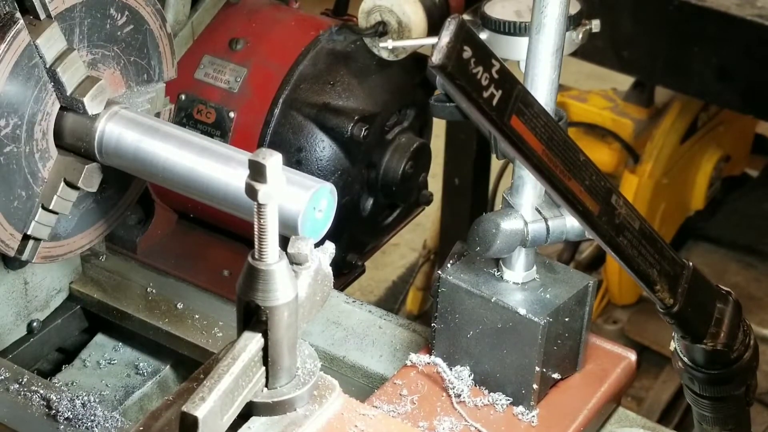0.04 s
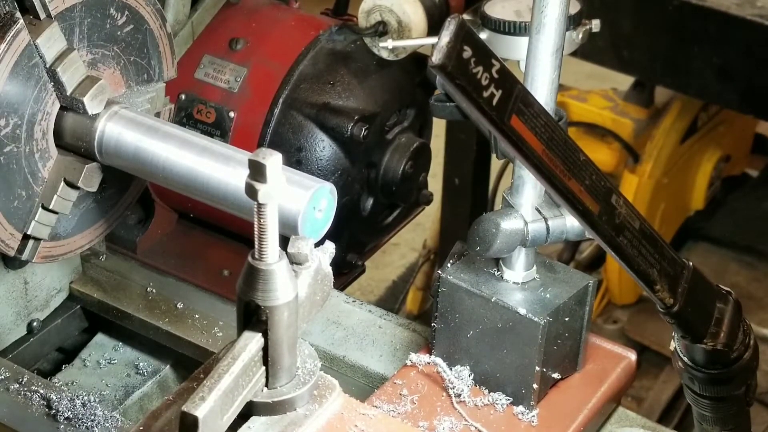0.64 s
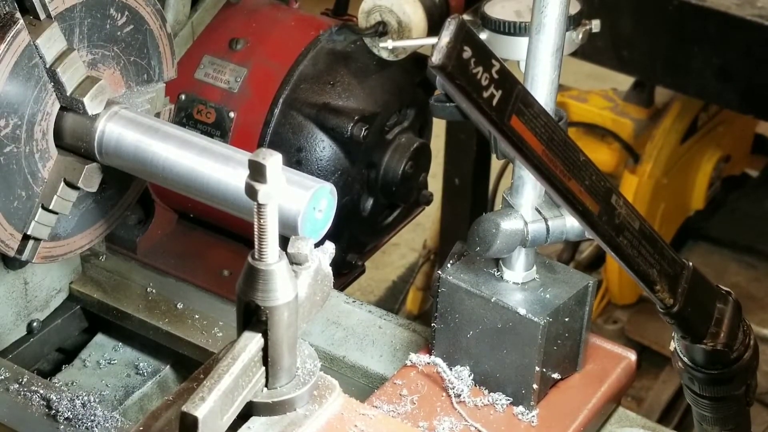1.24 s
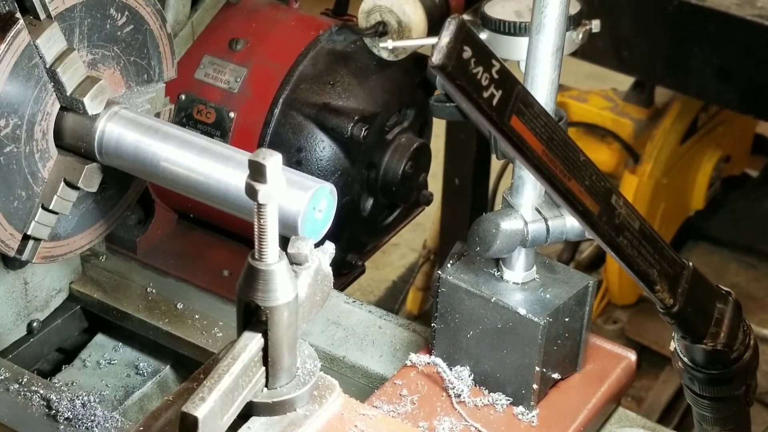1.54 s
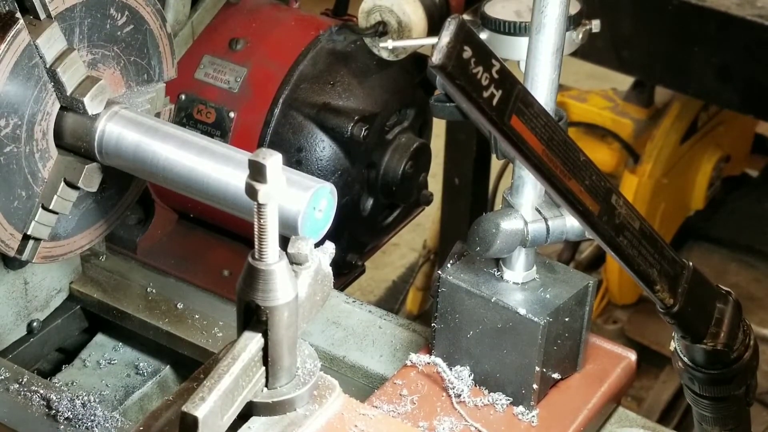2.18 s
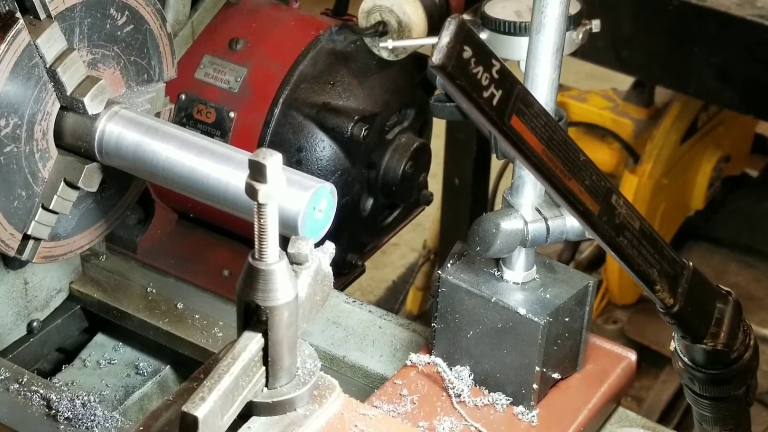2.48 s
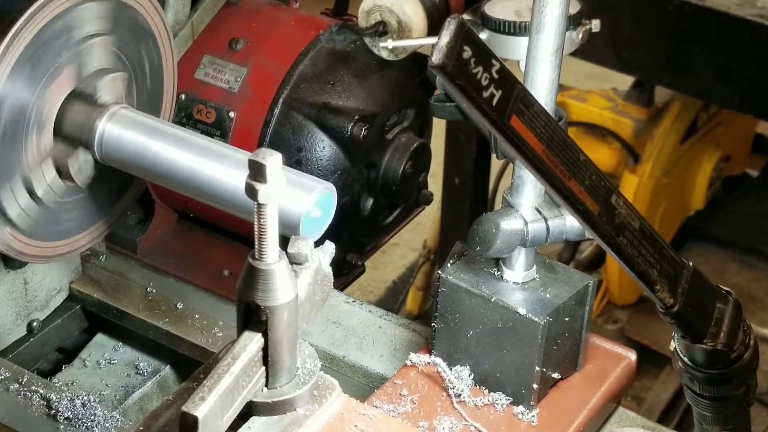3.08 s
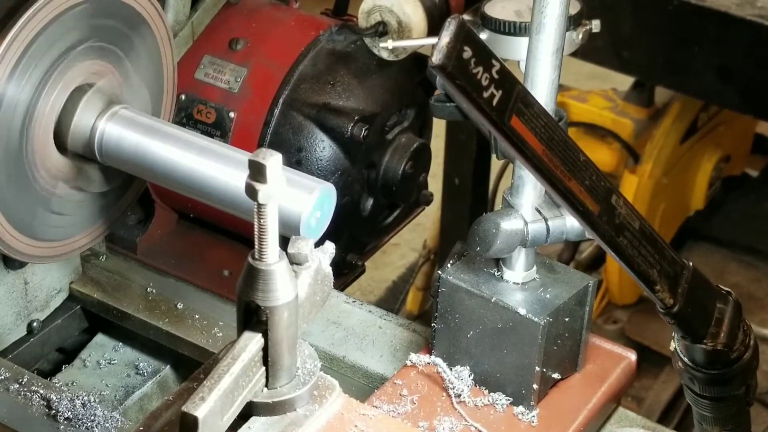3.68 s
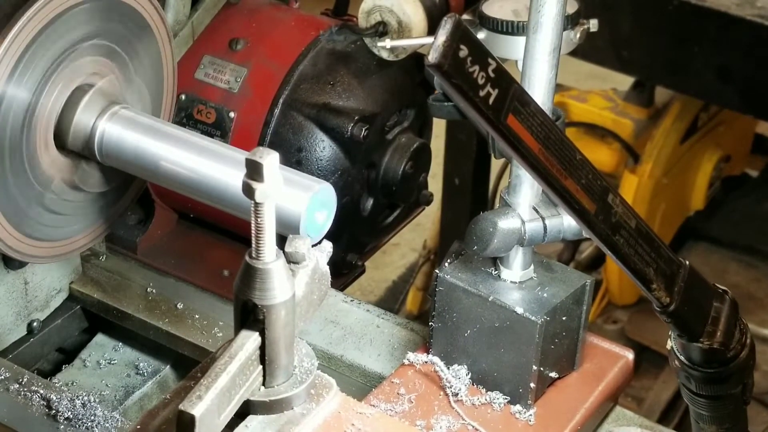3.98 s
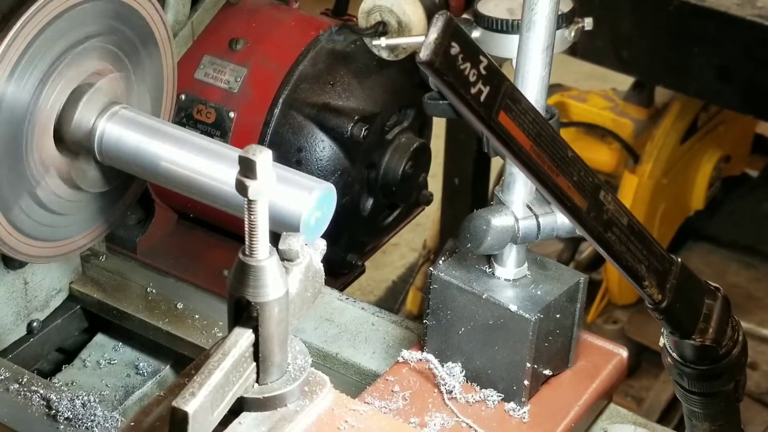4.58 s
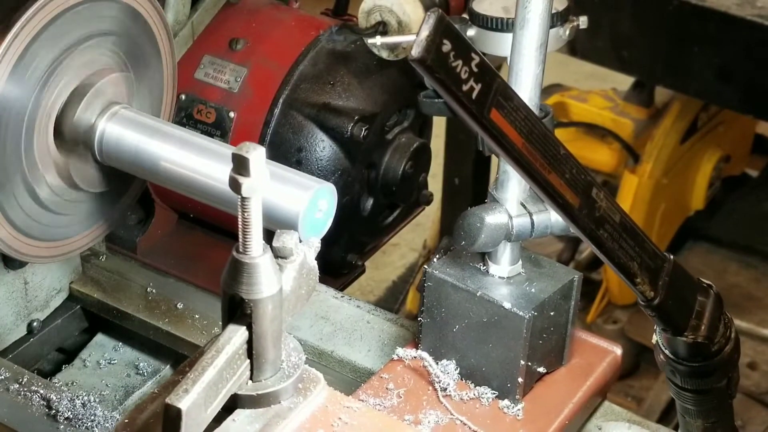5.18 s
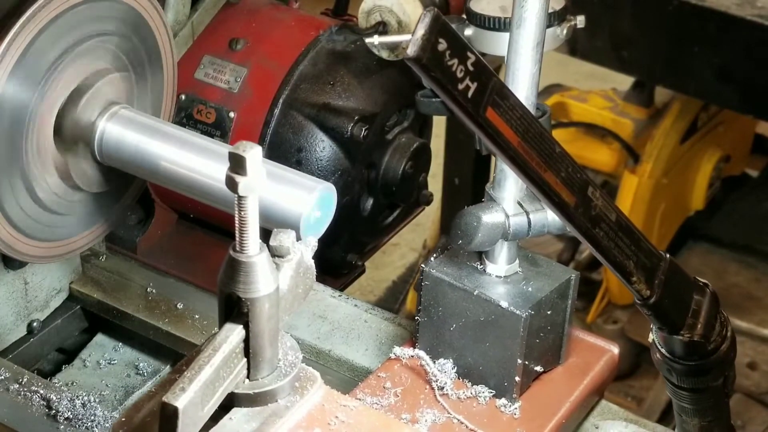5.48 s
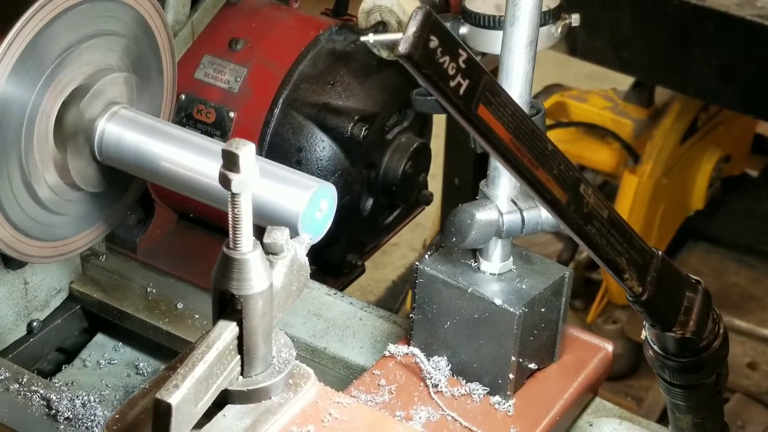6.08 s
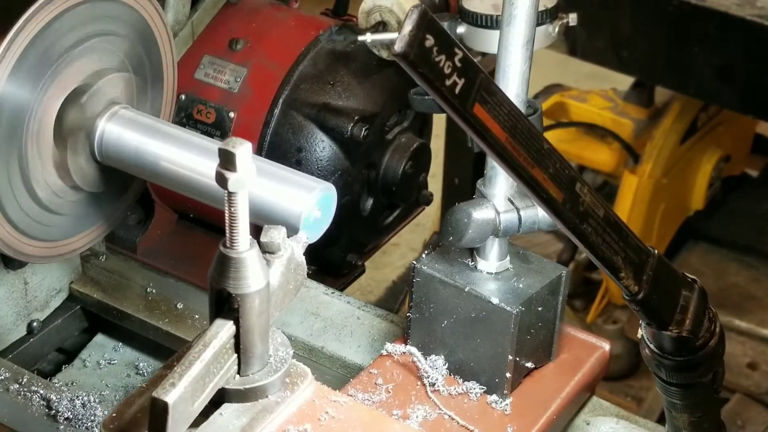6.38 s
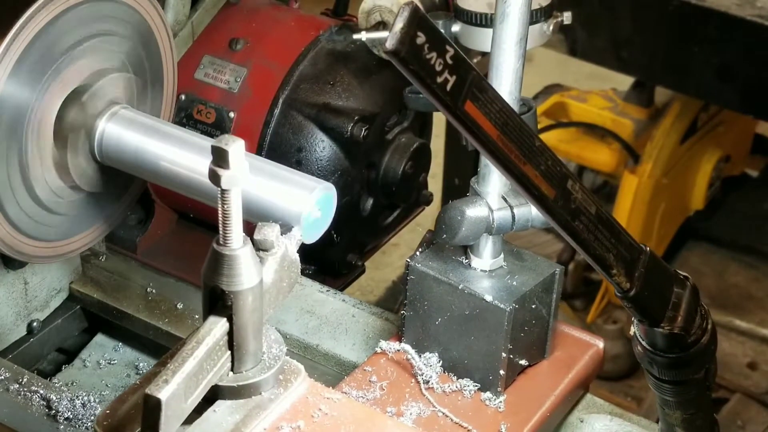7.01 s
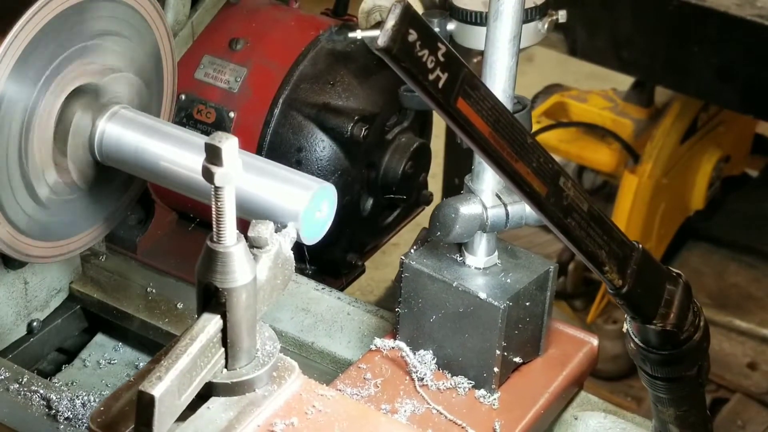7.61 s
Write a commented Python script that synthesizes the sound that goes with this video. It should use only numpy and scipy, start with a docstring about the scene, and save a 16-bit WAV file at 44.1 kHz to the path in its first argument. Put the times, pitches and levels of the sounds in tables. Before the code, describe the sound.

A metal lathe stands idle in a small workshop with a faint low drone. Its levers knock and click at about 0.2 to 0.4 seconds and again around 0.9 seconds, with a short room echo, followed by a few faint rubs. At about 2.9 seconds a switch clacks and the motor hums into life; the belt squeals briefly and the heavy frame shudders. By 3.6 seconds the machine is at full speed, close and steady, with gears whining and rattling over the electric hum and a low rumble. The drive ticks sharply four or five times a second, and a loose metal part pings and jingles lightly. From about 6.6 seconds the tool meets an aluminium bar, adding a light, pulsing chatter and a hiss of chips. Several short, high squeaks come between 7.1 and 7.7 seconds, and the cut continues to the end at about 8 seconds.

```python
"""A metal lathe runs in a small workshop: gears whine and rattle the headstock over the motor's mains hum.
First its levers knock, the switch clacks and the belt takes up the drive with a squeal and a shudder.
The drive ticks twice per spindle turn; a loose part pings and jingles.
Near the end the tool meets an aluminium bar: a light, chattering cut with chip hiss and short squeaks."""
import sys
import numpy as np
from scipy import signal
from scipy.fft import rfft, irfft, next_fast_len
from scipy.io import wavfile
from scipy.ndimage import map_coordinates

SR = 44100
rng = np.random.default_rng(int(sys.argv[2]) if len(sys.argv) > 2 else 0)


def file_out(sig):
    """Save sig as 16-bit WAV at sys.argv[1]."""
    # one column per channel
    cols = np.atleast_2d(sig).T
    # limit, then scale
    lim = np.clip(cols, -1, 1)
    pcm = np.round(lim * 32767).astype(np.int16)
    wavfile.write(sys.argv[1], SR, pcm)


N = 346185
START_S, RUN_UP_S = 2.95, 0.62
SPINDLE_HZ, MAINS_HZ, TOP_HZ = 2.211, 60.02, 15750

# stereo image: (frequency [Hz], left-right correlation [-])
CORRELATION = [(60, 0.95), (200, 0.96), (350, 0.91), (600, 0.7), (1100, 0.32), (2500, 0.22), (6000, 0.019),
               (13000, 0.037)]
# shop drone: (time [s], frequency [Hz], level [dB], octave level [dB])
DRONE = [(0, 57.7, -59, -81), (0.55, 55.1, -50.5, -59), (1.2, 58.2, -57, -61), (1.5, 65.3, -51, -56),
         (1.75, 67.76, -56, -58), (2.06, 69.84, -64, -73), (2.4, 65.95, -53, -57), (2.7, 63.75, -48, -54),
         (2.8, 65.9, -59, -67)]
# room noise: (frequency [Hz], relative density [dB])
ROOM_SPECTRUM = [(25, -29), (55, 0), (95, -8), (135, -7.5), (190, -14.5), (260, -19), (320, -17.5),
                 (375, -32.5), (440, -32), (510, -40), (2100, -41), (4200, -46.5), (8000, -60.5),
                 (12000, -40), (15600, -38.5)]
# shop reverberation: (frequency [Hz], t60 [s])
ROOM_DECAY = [(120, 0.74), (500, 0.69), (2000, 0.56), (5000, 0.84), (12000, 0.23)]
# lever, switch and drive contacts: (time [s], level [dB], hardness [octaves above 200 Hz])
KNOCKS = [(0.176, -38, 3), (0.1996, -24.5, 2), (0.24, -32, 2.5), (0.282, -40, 3.5), (0.348, -34.5, 2.5),
          (0.383, -33.5, 0.85), (0.420, -38, 5), (0.865, -27.5, 1.23), (0.868, -38.5, 3), (0.88, -36, 0.73),
          (0.894, -28.5, -0.64), (0.97, -42, 0.66), (1.018, -45.5, 3), (2.47, -73, 7.4), (2.906, -33, 2.9),
          (2.914, -34.5, 5), (2.942, -24, 2.4), (3.007, -24.5, 1.2), (3.055, -37.5, 5), (3.12, -42, 5),
          (3.231, -33, 1.63)]
# noise bands of a contact: (low edge [Hz], high edge [Hz], attack [s], t60 [s], gain [dB])
KNOCK_BANDS = [(94, 430, 0.0031, 0.22, 0.5), (460, 1120, 0.001, 0.15, 0.5),
               (1270, 2300, 0.0011, 0.16, -0.5), (3200, 3900, 0.0066, 0.098, -2),
               (7500, 25000, 0.0055, 0.042, 13.5)]
# lever linkage: (frequency [Hz], gain [dB], t60 [s])
LEVER_MODES = [(141.8, -3.5, 0.77), (239, -16, 0.3), (287.6, -2.5, 0.37), (348, -3, 0.09),
               (493, -12.5, 0.34), (633.6, -9, 0.23), (736, 3.5, 0.11), (885, 0.5, 0.053), (1187, -6, 0.21),
               (1576, -18, 0.1), (1970, -12, 0.12), (2380, -3, 0.12), (2593, -6.5, 0.24), (2690, -10, 0.15),
               (4180, -7, 0.038), (4830, -7, 0.019)]
# hard strikes of the loose part: (time [s], level [dB])
HARD_PINGS = [(0.348, -47), (3.338, -44), (3.483, -49), (3.563, -49), (3.99, -51), (4.297, -42.5),
              (4.398, -49), (5.111, -46), (5.923, -37), (6.025, -55), (6.228, -42), (6.533, -47)]
# loose part's ring: (frequency [Hz], width [Hz], gain [dB])
PING_PEAKS = [(6250, 260, 1), (6850, 400, -3)]
# jingling steel: (frequency [Hz], width [Hz], gain [dB])
TINKLE_PEAKS = [(8090, 150, -17), (9300, 160, 6), (10200, 200, -4), (12100, 200, 0), (12740, 200, 0)]
# drops of a small catch: (time [s], level [dB])
CATCH_DROPS = [(0.349, -47), (1.017, -39)]
# catch's ring: (frequency [Hz], gain [dB], t60 [s])
CATCH_MODES = [(1390, -4.5, 0.04), (1740, 0, 0.04), (1820, 1.5, 0.039), (1960, -12, 0.039),
               (2380, -6.5, 0.033)]
# rubs on the machine: (time [s], level [dB], Gaussian sigma [s])
BRUSHES = [(1.72, -71.5, 0.055), (2.47, -63.5, 0.019), (2.786, -69, 0.015), (2.91, -53, 0.014)]
# rubbing noise: (frequency [Hz], relative density [dB])
BRUSH_SPECTRUM = [(200, 3), (600, -2), (1150, -3), (2200, -17), (6000, -25), (14000, -24)]
# switch box: (frequency [Hz], gain [dB], t60 [s])
SWITCH_MODES = [(355, -2, 0.09), (630, -4, 0.035), (689, 8.5, 0.045), (1378, -7, 0.04), (1567, -10, 0.06),
                (2150, -17, 0.065), (2939, -18, 0.045), (3690, -24, 0.042), (5030, -28, 0.035)]
# motor's main note: (time [s], hum level [dB], rotor level [dB])
MOTOR_LEVELS = [(2.95, -37, -60), (2.985, -24, -60), (3.015, -39, -60), (3.055, -25.5, -58),
                (3.11, -35.5, -62), (3.26, -34.5, -47), (3.5, -35, -62.5), (3.9, -39, -58), (4.8, -40, -43),
                (6.35, -36.5, -40), (7.05, -41, -49), (7.43, -41, -59), (7.475, -28, -37),
                (7.58, -40, -46.5)]
# magnetic hum: (mains multiple [-], gain [dB])
HUM_HARMONICS = [(2, -11), (4, -16.5), (7, -15.5), (12, -32)]
# belt squeal: (frequency [Hz], width [Hz], gain [dB])
SQUEAL_PEAKS = [(988, 36, -7.5), (1110, 63, -2.5), (1250, 100, -11)]
# headstock casting: (frequency [Hz], relative density [dB])
CASTING_SPECTRUM = [(200, -49), (380, -5.5), (600, -1.5), (950, 1.5), (1120, -1), (1450, -6.5), (1800, -3),
                    (1950, -10.5), (2200, -5.5), (2800, -15), (4400, -22.5), (5600, -28.5), (6600, -29),
                    (7400, -42), (10500, -34), (15500, -46)]
# gear whine: (tooth-rate multiple [-], level [dB])
WHINE_HARMONICS = [(2, -51), (3, -59), (5, -51.5), (6, -51.5), (7, -56), (8, -45.5), (9, -53), (11, -48),
                   (12, -56), (14, -54), (18, -61)]
# drive rumble: (frequency [Hz], relative density [dB])
RUMBLE_SPECTRUM = [(25, -24), (55, -14.5), (95, -2.5), (135, 2.5), (165, -5), (250, -3.5), (320, -5.5),
                   (390, -4.5), (480, -14), (700, -45)]
# panels and guards: (frequency [Hz], width [Hz], level [dB])
PANEL_PEAKS = [(95.7, 12, -49), (140.6, 12.7, -40.5), (176, 6, -48), (202, 13, -52.5), (216, 13, -48),
               (290, 26, -49), (330, 13, -47), (417, 17, -57), (517, 16, -51.5), (554, 3.8, -53),
               (791.6, 20, -44), (856, 12, -54), (905, 10, -56), (984, 29, -44.5), (1053, 7.2, -46),
               (1288, 60, -52), (1580, 35, -58), (3315, 100, -62)]
# guard ringing near full speed: (frequency [Hz], width [Hz], gain [dB])
GUARD_PEAKS = [(778, 13, 2.5), (1216, 33, -9)]
# drive churn: (frequency [Hz], width [Hz], level [dB])
CHURN_PEAKS = [(337, 88, -47.5), (435, 43, -49.5), (513, 37, -54.5)]
# belt snatches: (time [s], level [dB])
JOLTS = [(2.985, -42), (3.034, -30.5), (3.069, -38), (3.128, -35.5), (3.203, -37), (3.386, -39)]
# frame on its feet: (frequency [Hz], gain [dB], t60 [s])
FRAME_MODES = [(48, -4, 0.23), (91.5, 6, 0.13), (131.5, 5.5, 0.26), (181, 4.5, 0.17)]
# ticking spots of the drive: (first time [s], level [dB], own ring [Hz])
TICK_SPOTS = [(3.436, -36.5, 12100), (3.7067, -37.5, 12800)]
# steel rung by both spots: (frequency [Hz], width [Hz], gain [dB])
STEEL_PEAKS = [(4450, 1200, 2.5), (6400, 1100, -7.5), (8000, 600, -13), (9650, 330, -6),
               (11500, 3000, -8.5)]
# chip hiss: (frequency [Hz], relative density [dB])
CHIP_SPECTRUM = [(2500, -23), (3750, 10), (4500, -1), (7000, -6), (8000, -3.5), (11500, -4.5), (12700, 0),
                 (13800, -1), (14200, -3), (15600, -2)]
# chip's ring: (frequency [Hz], width [Hz], level [dB])
CHIP_PEAKS = [(13000, 350, -60), (13600, 300, -61)]
# tool and bar chatter: (frequency [Hz], width [Hz], level [dB])
CHATTER_PEAKS = [(195.6, 7, -48), (324, 110, -42.5), (421, 11, -51), (490, 330, -42), (548, 47, -41.5),
                 (1210, 34, -48.5)]
# tool catching on the bar: (time [s], groan level [dB], bar level [dB])
BITES = [(6.755, -32, -55), (6.83, -34, -44), (6.94, -28, -49), (7.03, -34, -38), (7.09, -28.5, -47),
         (7.18, -30, -32), (7.235, -33.5, -37), (7.31, -31, -35), (7.40, -48, -37), (7.545, -45, -35),
         (7.635, -41, -31), (7.74, -29.5, -36), (7.82, -35.5, -28.5)]
# tool groan: (frequency [Hz], width [Hz], gain [dB])
GROAN_PEAKS = [(337, 60, 1.5), (413, 38, -7)]
# tool-tip squeaks: (time [s], level [dB])
SQUEAKS = [(7.09, -40), (7.19, -37), (7.28, -35.5), (7.52, -44), (7.605, -44), (7.695, -41)]


def amp(db):
    """Decibels to gain."""
    return 10 ** (np.asarray(db) / 20)


def unit(x):
    """x at rms 1."""
    return x / np.sqrt(np.mean(x ** 2) + 1e-20)


def along(points, hz):
    """Interpolate (Hz, value) points on a log axis."""
    knots_hz, values = np.transpose(points)
    return np.interp(np.log(hz + 1), np.log(knots_hz + 1), values)


def curves(rows):
    """Per-sample curve of each column after the time."""
    s, *columns = np.transpose(rows)
    return [np.interp(np.arange(N) / SR, s, column) for column in columns]


def wobble(rate_hz):
    """Smooth random curve, knots at rate_hz."""
    return map_coordinates(rng.standard_normal(1024), [np.arange(N) * rate_hz / SR], mode="wrap")


def since(s):
    """Seconds since time s, zero before."""
    return np.maximum(np.arange(N) / SR - s, 0)


def swell(s, attack_s, hold_s, t60_s):
    """Envelope from time s: rise, hold, decay."""
    return np.minimum(since(s) / attack_s, 1) ** 2 * amp(-60 * since(s + attack_s + hold_s) / t60_s)


def bump(t, sigma_s):
    """Gaussian envelope about t = 0."""
    return np.exp(-(t / sigma_s) ** 2 / 2)


def fade(t, attack_s, t60_s):
    """Envelope of one blow."""
    return (1 - np.exp(-t / attack_s)) * np.exp(-np.log(1000) * t / t60_s)


def blow_train(events, attack_s, t60_s):
    """Envelope of (s, dB) contacts, summed in power."""
    s, db = np.transpose(events)
    power = np.bincount(np.round(s * SR).astype(int), amp(db) ** 2, N)[:N]
    blow = fade(np.arange(SR // 4) / SR, attack_s, t60_s)
    return np.sqrt(abs(signal.fftconvolve(power, blow ** 2)[:N]))


def filtered(x, response):
    """Apply a frequency response."""
    n = x.shape[-1]
    padded = next_fast_len(n + 8192)
    return irfft(rfft(x, padded) * response(np.fft.rfftfreq(padded, 1 / SR)), padded)[..., :n]


def smooth(points):
    """Response through (Hz, dB) points."""
    return lambda hz: amp(along(points, hz))


def resonant(peaks):
    """Response of (Hz, width Hz, dB) resonances; dB sets each one's power."""
    return lambda hz: np.sqrt(sum(amp(db) ** 2 / width / (1 + ((hz - centre) / width * 2) ** 2) ** 2
                                  for centre, width, db in peaks))


def many_modes(response, width_hz, depth_db):
    """Response rippled by the dense modes of a large metal body."""
    ripple = rng.standard_normal(8192)

    def rippled(hz):
        position = np.log1p(hz / 2000) * 2000 / width_hz
        return response(hz) * amp(depth_db * map_coordinates(ripple, [position], mode="wrap"))
    return rippled


def stereo_rad(hz):
    """Mid-side angle for the left-right correlation at hz."""
    return np.arccos(np.clip(along(CORRELATION, hz), -1, 1)) / 2


def spread(pair, response):
    """Two independent signals to coloured stereo at rms 1, near mono in the bass."""
    mid, side = filtered(
        pair, lambda hz: response(hz) * np.array([np.cos(stereo_rad(hz)), np.sin(stereo_rad(hz))]))
    return unit(np.array([mid + side, mid - side]))


def noise(response, size=N):
    """Coloured stereo noise, rms 1."""
    return spread(rng.standard_normal((2, size)), response)


def singing(peaks):
    """Noise-driven resonances, each at its own rms level."""
    return noise(resonant(peaks)) * np.sqrt(sum(amp(db) ** 2 for _, _, db in peaks))


def tone(cycles, hz):
    """Stereo sine, rms 1; hz sets the left-right phase offset."""
    lag = stereo_rad(hz) * rng.choice([-1, 1])
    return np.sqrt(2) * np.sin(2 * np.pi * (cycles + rng.random()) + np.array([[lag], [-lag]]))


def ring(modes, t, attack_s):
    """Struck modes, levels slightly scattered."""
    return sum(amp(db + rng.normal(0, 0.58)) * tone(hz * t, hz) * fade(t, attack_s, t60_s)
               for hz, db, t60_s in modes)


def add(track, s, sound):
    """Mix a sound in at time s."""
    part = track[:, round(s * SR):][:, :sound.shape[-1]]
    part += sound[..., :part.shape[-1]]


def spindle_speed():
    """Fraction of full speed; the pull is hardest at first."""
    return 1 - (1 - np.minimum(since(START_S) / RUN_UP_S, 1)) ** 2


def blow_db(hz, hardness, below_db_per_oct=4, above_db_per_oct=10):
    """Contact spectrum: soft blows excite lows, hard ones highs."""
    octaves = np.log2(hz / 200) - hardness
    return min(below_db_per_oct * octaves, -above_db_per_oct * octaves)


def quiet_shop(floor_db=-54, swell_db=4):
    """Dull room noise swells under faint hiss; a low drone wanders until the lathe runs."""
    hz, db, octave_db = curves(DRONE)
    cycles = np.cumsum(hz) / SR
    drone = amp(db) * tone(cycles, np.mean(hz))
    drone += amp(octave_db + 2 * wobble(6.65)) * tone(2 * cycles, 2 * np.mean(hz))
    air = noise(smooth(ROOM_SPECTRUM))
    bass = filtered(air, lambda hz: 1 / (1 + (hz / 400) ** 4))
    air += (amp(swell_db * wobble(5.3)) - 1) * bass
    return (1 - spindle_speed()) * drone + amp(floor_db) * air


def knocks(linkage_db=-6, scrape_db=-21, scrape_rise_s=0.016):
    """Contacts slide briefly, then knock and ring the lever linkage."""
    out, t = np.zeros((2, N)), np.arange(SR // 2) / SR
    lead_s = np.arange(-SR // 12, 0) / SR
    scrape = amp(scrape_db) * np.exp(lead_s / scrape_rise_s)
    for s, db, hardness in KNOCKS:
        for low_hz, high_hz, attack_s, t60_s, band_db in KNOCK_BANDS:
            band = lambda hz: 1 / np.sqrt((1 + (low_hz / (hz + 1)) ** 8) * (1 + (hz / high_hz) ** 8))
            envelope = np.concatenate([scrape, fade(t, attack_s, t60_s)])
            gain = amp(db + band_db + blow_db(np.sqrt(low_hz * high_hz), hardness))
            add(out, s + lead_s[0], gain * noise(band, size=len(envelope)) * envelope)
        struck = [(hz, mode_db + blow_db(hz, hardness), t60_s) for hz, mode_db, t60_s in LEVER_MODES]
        add(out, s, amp(db + linkage_db) * ring(struck, t, attack_s=0.0026))
    return out


def walls(x):
    """Shop reverberation: a noise tail, shortest in the top treble."""
    hz, t, spectrum = signal.stft(rng.standard_normal((2, SR)), SR, nperseg=256)
    decay = np.exp(-np.log(1000) * t / along(ROOM_DECAY, hz)[:, None])
    tail = spread(signal.istft(spectrum * decay, SR, nperseg=256)[1], np.ones_like)
    return signal.fftconvolve(x, tail / np.linalg.norm(tail[0]), axes=1)[:, :N]


def loose_part(first_tap_s=3.379, shaft_hz=9.827, tap_db=-54, jingle_db=-60, tinkle_db=-66):
    """A loose part pings when jolted, taps once per turn of a fast shaft and jingles in between."""
    tap_s = np.arange(first_tap_s, N / SR, 1 / shaft_hz)
    taps = zip(tap_s, tap_db + rng.uniform(-6, 6, len(tap_s)))
    jingle_s = rng.uniform(first_tap_s, N / SR, size=220)
    scatter_db = 3 * rng.standard_normal(len(jingle_s))
    jingle = blow_train([*zip(jingle_s, scatter_db)], attack_s=0.0015, t60_s=0.074)
    jingle *= amp(6 * swell(3.4, attack_s=0.06, hold_s=0.16, t60_s=0.49))  # end of run-up
    strikes = blow_train([*HARD_PINGS, *taps], attack_s=0.0016, t60_s=0.056)
    ping = np.hypot(strikes, amp(jingle_db) * jingle) * noise(resonant(PING_PEAKS))
    return ping + amp(tinkle_db) * jingle * noise(resonant(TINKLE_PEAKS))


def catch():
    """A small catch drops and rings."""
    out, t = np.zeros((2, N)), np.arange(SR // 2) / SR
    for s, db in CATCH_DROPS:
        add(out, s, amp(db) * ring(CATCH_MODES, t, attack_s=0.00064))
    return out


def brushes():
    """Faint rubs against the standing machine."""
    t = np.arange(N) / SR
    envelope = sum(amp(db) * bump(t - s, sigma_s) for s, db, sigma_s in BRUSHES)
    return envelope * noise(smooth(BRUSH_SPECTRUM))


def switch(snap_s=2.9425, gain_db=-18):
    """The switch snaps in and rings its box."""
    out, t = np.zeros((2, N)), np.arange(SR // 2) / SR
    add(out, snap_s, amp(gain_db) * ring(SWITCH_MODES, t, attack_s=0.0014))
    return out


def motor(beat_hz=5.865, beat_peak_s=4.10, harmonics_db=-1):
    """Windings hum, hardest at starting current; the slipping rotor beats with mains harmonic 6."""
    t = np.arange(N) / SR
    hum_db, rotor_db = curves(MOTOR_LEVELS)
    beat = amp(hum_db) + amp(rotor_db) * np.exp(-2j * np.pi * beat_hz * (t - beat_peak_s))
    note_hz = 6 * MAINS_HZ
    waver = 1 + 0.44 * spindle_speed() ** 8 * wobble(14)
    note = abs(beat) * waver * tone(note_hz * t + np.angle(beat) / (2 * np.pi), note_hz)
    harmonics = sum(amp(db + hum_db + 2.9 * wobble(12)) * tone(k * MAINS_HZ * t, k * MAINS_HZ)
                    for k, db in HUM_HARMONICS)
    return np.minimum(since(START_S) / 0.01, 1) * (note + amp(harmonics_db) * harmonics)


def belt_squeal(gain_db=-30):
    """The belt squeals as it takes up the drive."""
    return amp(gain_db) * swell(START_S, attack_s=0.11, hold_s=0.028, t60_s=0.25) * singing(SQUEAL_PEAKS)


def mesh(turns, teeth, decay_per_tooth, scatter_db=3):
    """Each tooth lands with its own force: a short decaying pulse."""
    passed = turns * teeth
    force = amp(scatter_db * rng.standard_normal(4096))[passed.astype(int)]
    return unit(force * np.exp(-decay_per_tooth * (passed % 1)))


def gears(teeth=40, slack_db=-43, rattle_db=-35.5, creep_db_per_s=0.38, rolling=2.4, strain_db=5):
    """Tooth impacts rattle the headstock casting; the mesh whines at tooth-rate harmonics."""
    speed = spindle_speed()
    turns = np.cumsum(speed * SPINDLE_HZ * (1 + 0.0012 * wobble(5))) / SR
    impacts = mesh(turns, teeth, decay_per_tooth=1.9) + mesh(turns, teeth=89, decay_per_tooth=0.76)
    casting = many_modes(smooth(CASTING_SPECTRUM), width_hz=10, depth_db=1.6)
    force_db = slack_db + (rattle_db - slack_db) * speed ** 4 + creep_db_per_s * since(START_S)
    force = speed ** 0.1 * amp(force_db + 1.06 * wobble(9))
    rattle = force * spread((rolling + impacts) * rng.standard_normal((2, N)), casting)
    whine = sum(amp(db + wobble(12)) * tone(k * teeth * turns, k * teeth * SPINDLE_HZ)
                for k, db in WHINE_HARMONICS)
    # teeth briefly pressed harder
    strain = amp(strain_db * swell(3.6, attack_s=0.095, hold_s=0.05, t60_s=0.5))
    return rattle + speed ** 4 * strain * whine


def drive_rumble(rumble_db=-39, jerk_db=-35, guard_db=-41, churn_depth_db=4.5):
    """The belt jerks, then pulls unevenly: the drive rumbles and churns, panels and a guard sing."""
    speed = spindle_speed()
    surge = unit(amp(-0.1 * wobble(11)))
    jerk = amp(jerk_db) * swell(START_S, attack_s=0.1, hold_s=0.033, t60_s=0.59)
    rumble = (amp(rumble_db) * speed ** 0.99 + jerk) * noise(smooth(RUMBLE_SPECTRUM))
    panels = speed ** 5 * singing(PANEL_PEAKS)
    guard = amp(guard_db) * swell(3.355, attack_s=0.088, hold_s=0.34, t60_s=0.82) * singing(GUARD_PEAKS)
    churn = speed ** 3 * unit(amp(churn_depth_db * wobble(28))) * singing(CHURN_PEAKS)
    return surge * (rumble + panels) + guard + churn


def shudder():
    """Each belt snatch rocks the heavy frame."""
    out, t = np.zeros((2, N)), np.arange(SR // 2) / SR
    for s, db in JOLTS:
        add(out, s, amp(db) * ring(FRAME_MODES, t, attack_s=0.0062))
    return out


def drive_ticks(graze_lead_s=0.02, graze_db=-14, bounces=6, bounce_db=-9.5, fall_db_per_s=130,
                steel_db=1, ring_db=-12, ring_width_hz=650):
    """Two spots come round each spindle turn; each grazes, clacks and bounces at its own pitch."""
    out = np.zeros((2, N))
    for first_s, db, hz in TICK_SPOTS:
        events = []
        for s in np.arange(first_s, N / SR, 1 / SPINDLE_HZ):
            delays_s = 0.0062 + 0.107 * rng.random(bounces)
            levels_db = db + bounce_db - fall_db_per_s * delays_s + 2 * rng.standard_normal(bounces)
            clack_db = db + 1.3 * rng.standard_normal()
            events += [(s - graze_lead_s, db + graze_db), (s, clack_db), *zip(s + delays_s, levels_db)]
        force = blow_train(events, attack_s=0.002, t60_s=0.05)
        out += amp(steel_db) * force * noise(resonant(STEEL_PEAKS))
        ringing = amp(ring_db + 3 * wobble(5.3)) * blow_train(events, attack_s=0.0037, t60_s=0.11)
        out += ringing * noise(resonant([(hz, ring_width_hz, 0)]))
    return out


def cutting(touch_s=6.63, feed_s=0.45, runout=0.47, chip_db=-50, groan_db=-0.5, bar_hz=559):
    """The tool grazes five high spots a turn, then cuts throughout; at each bite the bar sings."""
    t = np.arange(N) / SR
    load = np.cos(2 * np.pi * 5 * SPINDLE_HZ * (t - 6.795))
    touching = np.minimum(since(touch_s) / 0.07, 1)
    depth = np.clip(since(touch_s) / feed_s + runout * load, 0, 1)
    scratch = unit(amp(0.5 * wobble(490) + wobble(70) + load))
    chip = scratch * (amp(chip_db) * noise(smooth(CHIP_SPECTRUM)) + singing(CHIP_PEAKS))
    chatter = unit(amp(-load - 0.9 * wobble(22))) * singing(CHATTER_PEAKS)
    on_tool = sum(amp(db) * bump(t - s, sigma_s=0.021) for s, db, _ in BITES)
    on_bar = sum(amp(db) * bump(t - s, sigma_s=0.021) for s, _, db in BITES)
    groan = amp(groan_db) * on_tool * unit(amp(2 * wobble(90))) * noise(resonant(GROAN_PEAKS))
    bar = on_bar * tone(bar_hz * t + 0.14 * wobble(25), bar_hz)
    return touching * (depth ** 0.5 * chip + chatter + groan + bar)


def squeaks(hz=2260, fall_hz_per_s=1800):
    """The tool tip sticks and sings briefly, pitch sagging."""
    out, t = np.zeros((2, N)), np.arange(-SR // 16, SR // 16) / SR
    for s, db in SQUEAKS:
        jitter_cycles = 0.36 * wobble(142)[:len(t)] / np.pi
        cycles = np.cumsum(hz - fall_hz_per_s * t) / SR + jitter_cycles
        add(out, s + t[0], amp(db) * bump(t, sigma_s=0.011) * tone(cycles, hz))
    return out


def scene(room_db=-7):
    """Contacts echo in the shop; the running machine and the cut stay dry."""
    contacts = knocks() + catch() + switch() + brushes() + drive_ticks() + loose_part()
    echo = amp(room_db) * walls(contacts)
    machine = motor() + belt_squeal() + shudder() + gears() + drive_rumble()
    return contacts + echo + machine + cutting() + squeaks() + quiet_shop()


def record(dry):
    """Steep low-pass at TOP_HZ."""
    return filtered(dry, lambda hz: np.clip((TOP_HZ - hz) / 100 + 0.5, 0, 1))


dry = scene()
out = record(dry)
file_out(out)
```